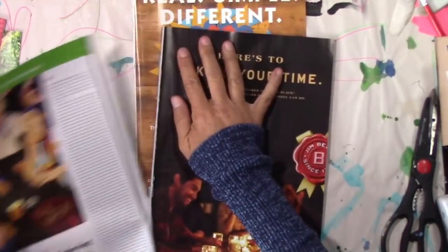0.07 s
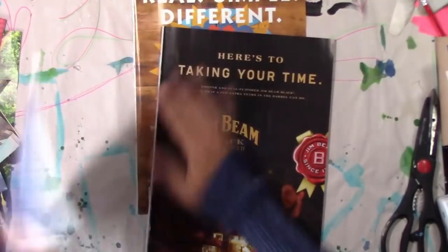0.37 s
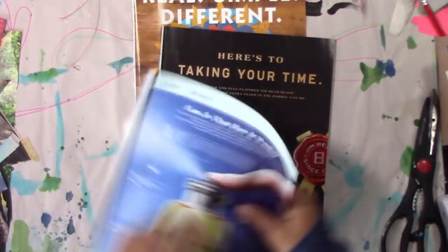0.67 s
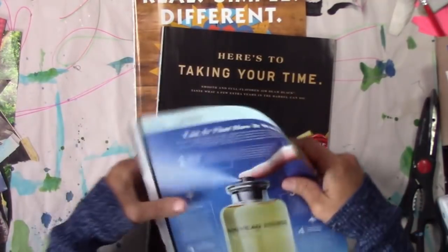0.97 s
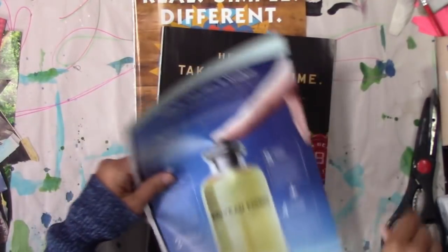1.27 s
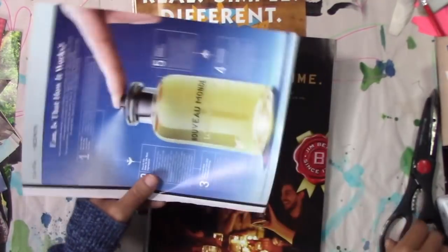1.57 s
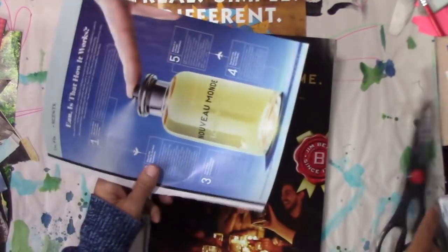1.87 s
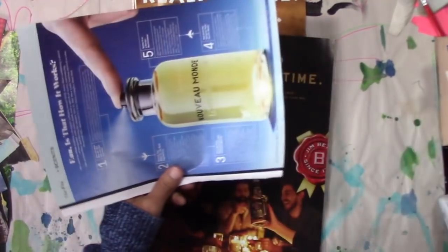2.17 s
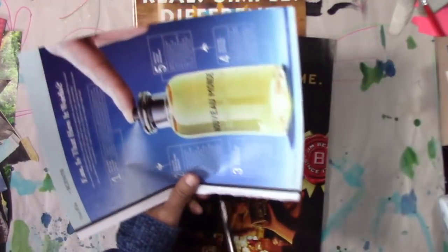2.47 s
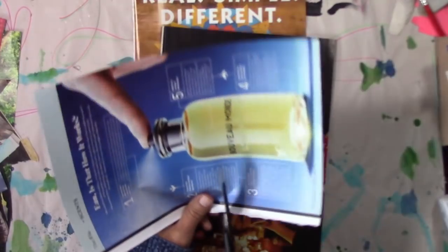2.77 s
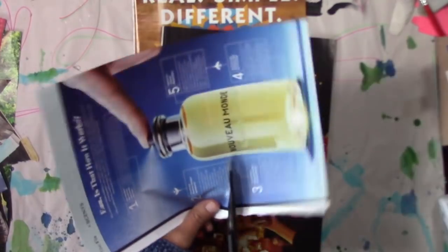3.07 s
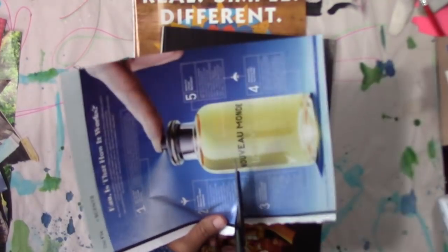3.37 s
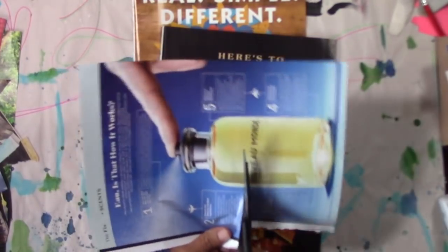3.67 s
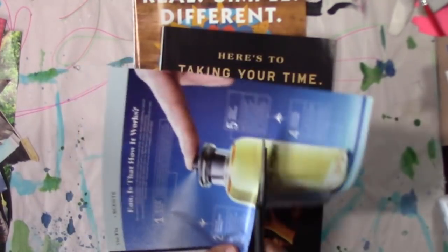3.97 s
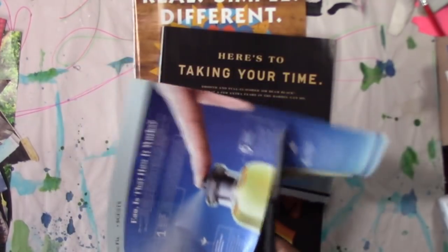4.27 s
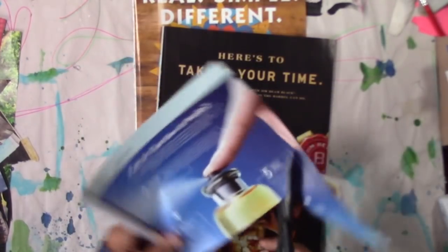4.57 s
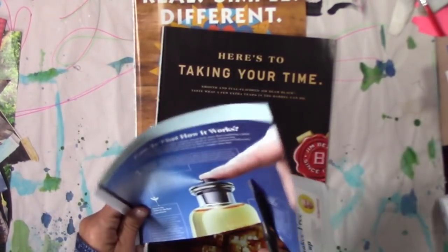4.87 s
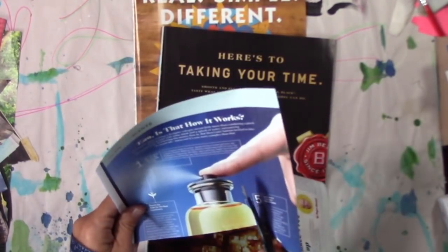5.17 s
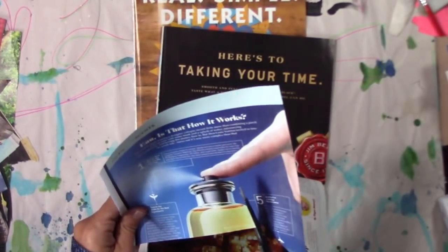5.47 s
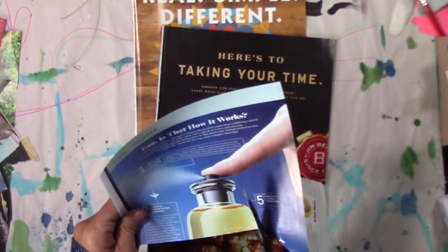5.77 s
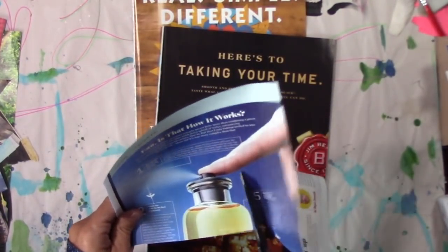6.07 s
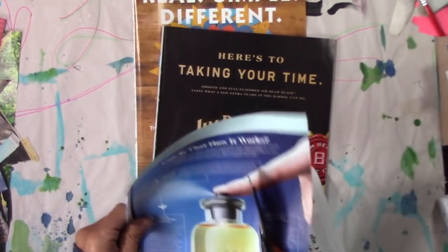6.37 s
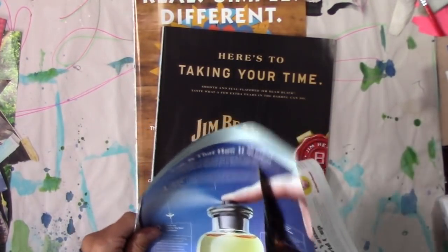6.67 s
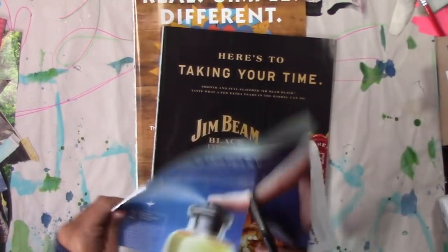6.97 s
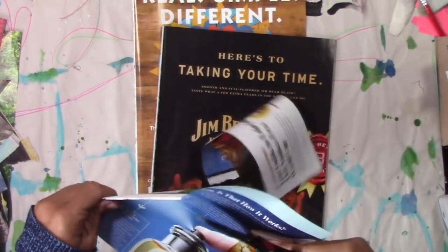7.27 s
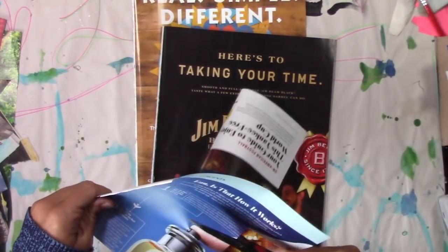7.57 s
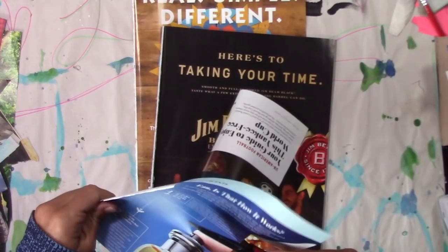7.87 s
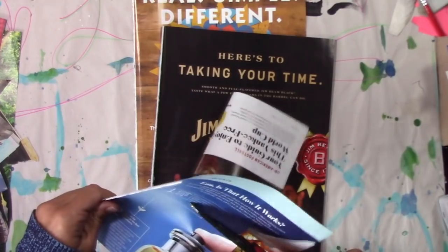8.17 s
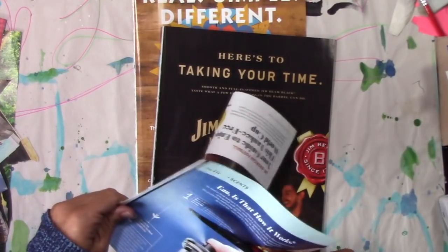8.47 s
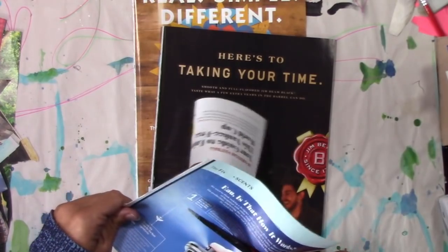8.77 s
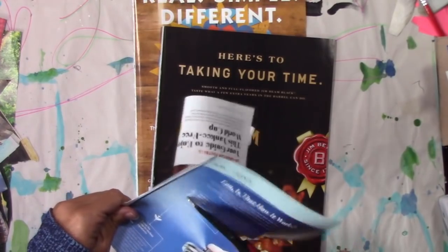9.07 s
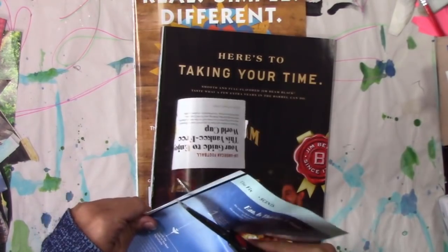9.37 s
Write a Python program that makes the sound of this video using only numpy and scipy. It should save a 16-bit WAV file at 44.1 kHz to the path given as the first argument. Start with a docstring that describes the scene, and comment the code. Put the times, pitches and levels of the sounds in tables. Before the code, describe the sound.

A glossy magazine page rips out right at the start with a short, loud, crisp tear, then flaps and crackles at about 0.5 to 0.7 seconds. Until 2.5 seconds the sheet rustles softly in the hands, with small snaps, hollow pops and two faint, dull table thumps. From about 2.8 to 4.4 seconds scissors slide, click and shear through the paper in a run of crunchy cuts, strongest around 4 seconds. A quieter stretch follows, with light rustling, ticks and a hollow pop near 4.8 seconds. The blades scrape again around 6 seconds and snip at 6.6. The sheet crinkles around 7 seconds, and a blade slide and paper snaps come between 8 and 8.5. Further snips land near 8.9 and 9.5 seconds. Everything sounds close, in a small room with little echo, over a faint, steady electrical hum and soft rush of air.

```python
"""A glossy page is ripped from a magazine, flaps, is turned in the hands and cut with scissors.
Paper sounds are swarms of tiny fibre breaks and slips that ring the sheet in three bands:
crunch (1.1-5 kHz), flutter (below) and fizz (above). The blades slide, click and shear.
The craft table and near walls of a small room colour it all; a 120 Hz hum and soft rush run beneath."""
import sys
import numpy as np
from scipy import signal
from scipy.fft import rfft, irfft, next_fast_len
from scipy.io import wavfile
from scipy.ndimage import uniform_filter1d, map_coordinates

SR = 44100
rng = np.random.default_rng(int(sys.argv[2]) if len(sys.argv) > 2 else 0)


def unload_audio(sound):
    """Save the sound as a 16-bit wav file, at the path given as the first command line argument."""
    columns = np.transpose(np.atleast_2d(sound))
    # keep every value between -1 and 1, then stretch to whole-number steps
    steps = np.round(np.clip(columns, -1, 1) * 32767)
    wavfile.write(sys.argv[1], SR, steps.astype(np.int16))


N = 424241
LEAD_SAMPLES = 128  # delay of the strike within a paper ring

# Spectrum of taut paper. Each row: frequency in Hz, level in dB.
TAUT_SPECTRUM = [(25, -63), (150, -20), (280, -16), (400, -8), (520, 1), (750, -7.5), (1020, -1.5),
                 (1350, -5), (2000, -3), (3000, -3), (5000, -10.5), (10000, -21.5), (16000, -41)]
# Resonances of the table and near walls that colour every paper sound. Each row: frequency in Hz, width in Hz,
# lift in dB.
ROOM_MODES = [(495, 50, 3), (1128, 70, 3.5), (1542, 196, 6), (1980, 190, 4), (2510, 115, 6.5),
              (3057, 130, 2.5), (3565, 160, 4)]


def rip():
    """Taut fibres break as the page rips along the spine and flaps free."""
    # Each row: one pull, columns as in effort().
    pulls = [(0.0, 0.16, -22, -2.5, -2.5, -3.5), (0.528, 0.07, -29, -19, -2, -9),
             (0.644, 0.068, -38.5, -19, -6, -27)]
    taut = paper_rings(TAUT_SPECTRUM, ROOM_MODES)
    pull = effort(pulls, attack_s=0.001, release_t60_s=0.055, arch_db=-2, dulling_db=-3.5)
    return amp(-2.5) * fibre_swarm(pull, taut, per_second=2000, spread_db=4.5, clump_db=0.5,
                                   clump_hz=210, rub_db=-9, flex_db=3.5, sparkle_db=7)


def scissors():
    """The blades slide along the sheet, click into the end of the slit and shear the fibres."""
    # Each row: one blade stroke, columns as in effort().
    slides = [(2.745, 0.11, -48, -6, -3.5, -8.5), (2.87, 0.054, -53, 10, 4, -1),
              (3.105, 0.089, -45.5, 3, 6, 0), (3.175, .15, -39, -5.5, -4, -9.5),
              (3.356, .15, -44.5, -8, 2.5, -4.5), (3.52, .12, -40, 8, 2, -6),
              (3.85, 0.097, -41.5, -2, -2.5, -7), (4.215, 0.09, -43.5, -14, 3, -6),
              (4.365, 0.053, -41, -14, 1, -4.5), (5.885, 0.043, -49.5, 19, 1, -6),
              (5.93, 0.12, -35, -0.5, -11, -9.5), (6.145, 0.74, -53.5, -8.5, -2.5, -4.5),
              (6.58, .03, -44.5, 9, -1, -6), (6.73, 0.05, -48.5, -9, 6.5, -10),
              (7.92, 0.11, -43, 12.5, -4.5, -9), (8.035, 0.069, -33, -2, -10, -13),
              (8.822, 0.041, -39.5, 8, -17, -14.5), (9.125, 0.11, -54, 7, -9, -1.5),
              (9.24, 0.047, -42, -7, -1, -9.5), (9.295, 0.12, -55.5, -6, 0, -9.5)]
    cuts = [(2.909, 0.098, -29.5, 2, -13, -3), (3.378, 0.091, -28.5, -6.5, -7.5, -10),
            (3.63, 0.12, -31.5, 3.5, 2.5, -6.5), (3.73, .13, -25.5, -4.5, -5.5, -4.5),
            (3.942, 0.13, -26, 0.5, -3, -6.5), (4.08, .14, -21, -7, -10, -6.5),
            (4.298, 0.056, -27.5, -1.5, 0, -11), (6.607, 0.12, -30, 3.5, -8.5, -7.5),
            (8.855, 0.097, -33, 0.5, -6.5, -8.5), (9.467, 0.057, -36, 10.5, -6, -5),
            (9.515, .105, -30.5, 1, -8.5, -5.5)]
    # Blade clicks. Each row: time in seconds, relative level in dB, fizz offset in dB.
    bites = [(2.316, -41.5, 5.5), (2.9078, -13.5, -12.5), (2.9693, -18, -18), (2.992, -13, -20),
             (3.079, -22.5, -6), (3.0848, -26, -14), (3.0946, -22.5, -7), (3.5219, -22, -13),
             (4.05, -24.5, 6), (4.854, -43, -4), (4.873, -38.5, -6), (6.6076, -19, 1), (8.8225, -30, -5.5),
             (8.8532, -24, 3.5), (9.3767, -36.5, -17), (9.6026, -21.5, 4)]
    # Paper under the blades. Each row: frequency in Hz, level in dB.
    slide_spectrum = [(100, -36), (330, -15), (490, 0), (650, -4), (770, -8.5), (1500, -3.5), (2600, -1.5),
                      (3800, -5.5), (4900, -14), (6500, -12.5), (10000, -21), (16000, -40)]
    cut_spectrum = [(30, -74), (180, -21.5), (270, -28), (380, -11), (490, -3), (660, -3), (760, -9),
                    (1200, -7), (2500, -1), (3600, -1.5), (4900, -8), (6500, -4.5), (10000, -10.5),
                    (16000, -29.5)]
    # Ringing of the rubbing blades. Each row: frequency in Hz, width in Hz, lift in dB.
    blade_modes = [(4140, 220, 4.5), (4620, 130, 5), (6100, 200, 2.5), (7200, 160, 3.5), (9840, 400, 0.5)]
    rubbed = paper_rings(slide_spectrum, ROOM_MODES + blade_modes)
    sheared = paper_rings(cut_spectrum, ROOM_MODES + blade_modes)
    push = effort(slides, attack_s=0.013, release_t60_s=0.11, arch_db=0, dulling_db=-1)
    slide = amp(-0.7) * fibre_swarm(push, rubbed, per_second=3000, spread_db=2, clump_db=2.5,
                                    clump_hz=130, rub_db=-3, flex_db=0, sparkle_db=2.5)
    squeeze = effort(cuts, attack_s=0.0042, release_t60_s=0.08, arch_db=2.5, dulling_db=5)
    shear = amp(-1.54) * fibre_swarm(squeeze, sheared, per_second=2600, spread_db=2.5, clump_db=1.5,
                                     clump_hz=260, rub_db=-6.5, flex_db=2.4, sparkle_db=1.5)
    clicks = np.zeros(N)
    for start_s, db, fizz_db in bites:
        ring = amp([db + 9.5, db + 2, db + fizz_db + 14.5]) @ sheared
        add(clicks, start_s - LEAD_SAMPLES / SR, crack(ring, t60_s=0.0054, crumple_db=3.5))
    return without_bass(slide + shear + clicks)


def rustle():
    """The loose sheet rubs and crinkles in the hands, with stray ticks."""
    # Each row: one hand movement, columns as in effort().
    moves = [(0.2, .3, -58, 9, -6, -5), (0.727, 0.089, -44, 0.5, -2, -3.5), (0.83, 0.15, -53.5, 0, -16, -6),
             (0.968, 0.18, -40, -9, 0, -13), (1.17, 0.19, -64.5, -5, -2, 1.5),
             (1.34, 0.66, -59.5, -5, 1, 1), (1.655, 0.097, -52, -9, 5, -8),
             (2.155, 0.41, -60.5, -11, -14, -4), (4.43, 0.4, -55, -11, -6, -1),
             (5.2, 0.049, -64.5, -3, -4, -5), (6.79, 0.22, -52.5, -4, -8, -6.5),
             (6.995, 0.17, -52.5, 0, -10, 0.5), (7.2, 0.27, -59.5, -4, -7, -6),
             (8.2, 0.14, -56, -13, -3, -5.5), (8.335, 0.069, -39.5, -12, 1, -17),
             (8.41, 0.21, -56.5, -11, 1, -5), (8.7, 0.15, -60, 5, 2, -7)]
    # Loose paper. Each row: frequency in Hz, level in dB.
    loose_spectrum = [(60, -67), (170, -17.5), (320, -9.5), (500, 0), (800, -5), (1500, -0.5), (3000, -1.5),
                      (5000, -10), (8000, -14), (11000, -21), (16000, -34)]
    loose = paper_rings(loose_spectrum, ROOM_MODES)
    touch = effort(moves, attack_s=0.015, release_t60_s=0.092, arch_db=-2, dulling_db=0.5)
    rubbing = amp(-2.07) * fibre_swarm(touch, loose, per_second=1500, spread_db=5, clump_db=4.5,
                                       clump_hz=51, rub_db=-0.5, flex_db=2.5, sparkle_db=0.5)
    tick_gain = np.minimum(amp(-8) * touch[0], amp(-57))
    tick_force = tick_gain * breaks(N, per_second=30, spread_db=4)
    ticks = signal.oaconvolve(tick_force, [1, 0.6, 0.3] @ loose)[LEAD_SAMPLES:LEAD_SAMPLES + N]
    return rubbing + without_bass(ticks)


def snaps():
    """The sheet buckles or is tapped; a smaller dent rings higher."""
    # Each row: time in seconds, relative level in dB, fizz offset in dB, t60 in seconds, pitch in Hz.
    dents = [(0.029, -6, -21, 0.064, 1100), (0.0514, -7.5, -11, 0.011, 1110),
             (0.0769, -5.5, -18, 0.022, 1090), (0.0891, -7, -8, 0.036, 1480), (0.395, -32, -16, 0.03, 2420),
             (0.5012, -18, -8.5, 0.05, 1980), (0.5313, -13, -15, 0.035, 1970),
             (0.612, -9, -13.5, 0.034, 3080), (0.633, -9.5, -11, 0.019, 2580),
             (0.9152, -27.5, -13, 0.12, 1550), (0.9774, -26, -13, 0.022, 2500),
             (1.1408, -27.5, -42, 0.024, 1300), (1.468, -30, -22, 0.017, 2500),
             (1.6039, -29.5, -19, 0.019, 2410), (1.674, -19.5, -19, 0.027, 1380),
             (1.7552, -27, -6, 0.021, 820), (1.937, -37.5, -14, 0.033, 1370), (2.42, -42, -8, 0.11, 2500),
             (4.353, -15, -10, 0.034, 1460), (4.762, -40, -9, 0.082, 2000),
             (4.9123, -31.5, -12, 0.06, 2500), (5.5837, -23.5, -4, 0.041, 2630),
             (6.0927, -26.5, -29, 0.098, 2050), (6.5254, -26.5, -29, 0.033, 2520),
             (6.812, -34, -26, 0.069, 1500), (7.0048, -39.5, 0.5, 0.05, 2410),
             (7.156, -18.5, -37, 0.089, 2260), (8.2485, -32.5, -18.5, 0.023, 2050),
             (8.325, -17, -17, 0.038, 1590), (8.3725, -25, -28, 0.064, 1560),
             (8.4122, -35, -25, 0.06, 1470), (8.4525, -27.5, -21, 0.012, 1570),
             (9.0502, -28.5, -10, 0.16, 1500)]
    track = np.zeros(N)
    for start_s, db, fizz_db, t60_s, hz in dents:
        dent = paper_rings(TAUT_SPECTRUM, ROOM_MODES + [(hz, 0.3 * hz, 6)])
        flutter_db = 4.5 - 0.29 * db  # hard snaps are crisp, soft ones hollow
        ring = amp([db + 14.5, db + flutter_db, db + fizz_db + 17]) @ dent
        add(track, start_s - LEAD_SAMPLES / SR, crack(ring, t60_s, crumple_db=7.5))
    return without_bass(track)


def pops():
    """The curved sheet flips through with a hollow pop."""
    # Each row: time in seconds, level in dB, pitch in Hz.
    flips = [(0.986, -30, 540), (1.524, -34.5, 570), (1.754, -25.5, 506), (3.004, -21, 517),
             (4.542, -32.5, 500), (4.806, -24, 506), (6.093, -21.5, 510), (6.39, -31, 514),
             (6.425, -29, 505), (7.012, -32, 500)]
    track = np.zeros(N)
    for start_s, db, hz in flips:
        add(track, start_s, amp(db) * knock(hz, t60_s=0.024, attack_s=0.00095))
    return without_bass(track)


def thumps():
    """Soft thumps carry through the table."""
    # Each row: time in seconds, level in dB.
    bumps = [(1.375, -51), (2.44, -58)]
    track = np.zeros(N)
    for start_s, db in bumps:
        add(track, start_s, amp(db) * knock(hz=61.6, t60_s=0.2, attack_s=0.012))
    return track


def effort(strokes, attack_s, release_t60_s, arch_db, dulling_db):
    """Crunch, flutter and fizz envelopes: each stroke takes hold, arches, swells and lets go."""
    t = np.arange(N) / SR
    power = np.zeros((3, N))
    # Each row: start in seconds, length in seconds, relative crunch level in dB,
    # swell from start to end in dB, flutter and fizz in dB re crunch.
    for start_s, length_s, db, swell_db, flutter_db, fizz_db in strokes:
        active = slice(*np.searchsorted(t, [start_s, start_s + length_s + 2 * release_t60_s]))
        age_s = t[active] - start_s
        travel = np.minimum(age_s / length_s, 1) - 0.5
        release_db = 60 * np.maximum(age_s - length_s, 0) / release_t60_s
        crunch_db = db + swell_db * travel + arch_db * (1 / 3 - (2 * travel) ** 2) - release_db
        bands = amp([crunch_db, crunch_db + flutter_db, crunch_db + fizz_db - dulling_db * travel])
        grip = np.minimum(age_s / attack_s, 1)
        power[:, active] += (grip * bands) ** 2
    return np.sqrt(power)


def fibre_swarm(levels, rings, per_second, spread_db, clump_db, clump_hz, rub_db, flex_db, sparkle_db):
    """Clumps of fibre breaks over smooth rubbing ring the sheet, following the band envelopes."""
    clumps = unit(breaks(N, per_second, spread_db) * amp(clump_db * wobble(clump_hz)))
    rubbing = amp(rub_db) * rng.standard_normal(N)
    force = unit(flexing(clumps + rubbing, flex_db))
    sharp = unit(force * amp(sparkle_db * wobble(350)))  # some breaks are brighter
    bands = signal.oaconvolve(levels * [force, force, sharp], rings, axes=1)
    return bands.sum(0)[LEAD_SAMPLES:LEAD_SAMPLES + N]


def paper_rings(spectrum, modes, size=4096):
    """Crunch, flutter and fizz responses to one fibre break."""
    hz = np.fft.rfftfreq(size, 1 / SR)
    lift_db = sum(db / (1 + (2 * (hz - mode_hz) / width_hz) ** 2) for mode_hz, width_hz, db in modes)
    over_flutter, over_crunch = (1 - 1 / (1 + (hz / edge_hz) ** 8) for edge_hz in (1100, 5000))
    bands = np.array([over_flutter - over_crunch, 1 - over_flutter, over_crunch])
    # minimum phase: the paper rings only after it is struck
    cepstrum = irfft(np.log(amp(along(spectrum, hz) + lift_db)))
    fold = np.r_[1, np.full(size // 2 - 1, 2), np.zeros(size // 2)]
    response = np.exp(rfft(cepstrum * fold))
    rings = np.roll(irfft(response * bands), LEAD_SAMPLES, axis=1)[:, :size // 2]
    return rings / np.linalg.norm(rings, axis=1, keepdims=True)


def breaks(count, per_second, spread_db):
    """Random impulses, mostly small with a few large ones."""
    present = rng.random(count) < per_second / SR
    strength = amp(spread_db * np.minimum(rng.standard_normal(count), 2.3))
    return unit(present * strength * np.sign(rng.standard_normal(count)))


def crack(ring, t60_s, crumple_db, count=8192):
    """One sharp break sets off a run of smaller ones that builds and dies away."""
    t = np.arange(count) / SR
    envelope = amp(-60 * t / max(t60_s, 0.003)) * (1 - np.exp(-t / 0.0018))
    run = breaks(count, per_second=5000, spread_db=2.5) * envelope
    force = amp(crumple_db) * run / np.linalg.norm(run)
    force[0] += 1
    return signal.fftconvolve(force / np.linalg.norm(force), ring)


def knock(hz, t60_s, attack_s):
    """A heavily damped low mode."""
    t = np.arange(SR // 3) / SR
    return np.cos(2 * np.pi * hz * t) * amp(-60 * t / t60_s) * (1 - np.exp(-t / attack_s))


def flexing(x, depth_db):
    """Resonances come and go as the sheet bends: patches of gain over time and frequency."""
    spectra = signal.stft(x, nperseg=512)[2]
    patches = uniform_filter1d(rng.standard_normal(spectra.shape), size=5, axis=0)
    patches = uniform_filter1d(patches, size=7, axis=1)
    return signal.istft(spectra * amp(depth_db * patches / patches.std()), nperseg=512)[1][:N]


def without_bass(x, corner_hz=130):
    """Remove the deep bass below about 130 Hz."""
    return filtered(x, lambda hz: 1 - 1 / (1 + (hz / corner_hz) ** 4))


def room(x, block=16384, overlap=512):
    """Nearly mono echoes, redrawn block by block as the sheet moves."""
    # Left-right difference of the echoes. Each row: frequency in Hz, gain in dB.
    side_spectrum = [(700, -14), (2600, 10.5), (4000, 11.5), (8000, 10), (13000, 2)]
    mid, side = np.zeros(N), np.zeros(N)
    for start in range(0, N, block):
        piece = x[start:start + block + overlap]
        fade = np.interp(np.arange(len(piece)), [0, overlap, block, block + overlap],
                         [start == 0, 1, 1, 0])
        echoes = reflections(wet_db=-6, side_db=-33, early_db=-8, early_t60_s=0.043)
        for track, echo in zip((mid, side), echoes):
            add(track, start / SR, signal.fftconvolve(piece * fade, echo))
    side = filtered(side, lambda hz: amp(along(side_spectrum, hz)))
    return np.array([mid + side, mid - side])


def reflections(wet_db, side_db, early_db, early_t60_s):
    """Mid and side responses for one sheet position: direct sound, table and shelves, short tail."""
    # Room decay. Each row: frequency in Hz, t60 in seconds.
    decay = [(200, 0.16), (800, 0.165), (2500, 0.16), (6000, 0.16), (15000, 0.15)]
    hz, t, spectra = signal.stft(rng.standard_normal((2, SR // 4)), SR, nperseg=256)
    tail = signal.istft(spectra * amp(-60 * t / along(decay, hz)[:, None]), SR, nperseg=256)[1]
    age_s = np.arange(tail.shape[1]) / SR
    early = breaks(len(age_s), per_second=1500, spread_db=5.5)
    early *= amp(-60 * age_s / early_t60_s) * (age_s > 0.001)
    tail *= 1 - np.exp(-age_s / 0.0011)
    tail /= np.linalg.norm(tail, axis=1, keepdims=True)
    mid = amp(wet_db) * tail[0] + amp(early_db) * early / np.linalg.norm(early)
    mid[0] += 1
    return np.array([mid / np.linalg.norm(mid), amp(side_db) * tail[1]])


def hum(hz=120):
    """Steady electrical hum."""
    rms = amp(-52.5 + 0.15 * wobble(5))
    return rms * np.sqrt(2) * np.sin(2 * np.pi * hz * np.arange(N) / SR)


def room_air():
    """Soft rush of the room."""
    # The rush and its left-right difference. Each row: frequency in Hz, gain in dB.
    air_spectrum = [(25, -18), (45, -20), (70, -10), (140, 0.5), (200, -1), (310, 4.5), (400, -3), (550, 0),
                    (800, -5.5), (1600, -9), (3000, -13.5), (5000, -18), (8000, -20.5), (12000, -29),
                    (16000, -31)]
    side_spectrum = [(25, -4), (60, -9.5), (130, -14), (290, -10), (640, -8.5), (1410, -8.5), (3100, -9),
                     (6820, -13), (15000, -24.5)]
    rush = unit(filtered(rng.standard_normal((2, N)), lambda hz: amp(along(air_spectrum, hz))))
    mid = amp(-57 + 0.25 * wobble(1.8)) * rush[0]
    side = amp(-57) * filtered(rush[1], lambda hz: amp(along(side_spectrum, hz)))
    return np.array([mid + side, mid - side])


def amp(db):
    """Decibels to gain."""
    return 10 ** (np.asarray(db) / 20)


def unit(x):
    """Scale to rms 1."""
    return x / np.sqrt(np.mean(x ** 2, axis=-1, keepdims=True) + 1e-20)


def along(points, hz):
    """Interpolate (Hz, value) points on a log axis."""
    knots_hz, values = np.transpose(points)
    return np.interp(np.log(hz + 1), np.log(knots_hz), values)


def wobble(rate_hz):
    """Random curve with rate_hz knots a second."""
    knots = rng.standard_normal(int(N * rate_hz / SR) + 4)
    return map_coordinates(knots, [np.arange(N) * rate_hz / SR], order=1)


def filtered(x, response):
    """Apply the gain response(hz)."""
    count = x.shape[-1]
    size = next_fast_len(count + 8192)
    return irfft(rfft(x, size) * response(np.fft.rfftfreq(size, 1 / SR)), size)[..., :count]


def add(track, start_s, sound):
    """Mix a sound in at start_s."""
    start = max(round(start_s * SR), 0)
    track[start:start + len(sound)] += sound[:max(N - start, 0)]


def scene():
    """Page and scissors in the humming room."""
    page = rip() + rustle() + snaps() + pops()
    return room(page + thumps() + scissors()) + hum() + room_air()


def record(dry):
    """Brick-wall low-pass at 15.9 kHz."""
    return filtered(dry, lambda hz: hz < 15900)


dry = scene()
out = record(dry)
unload_audio(out)
```